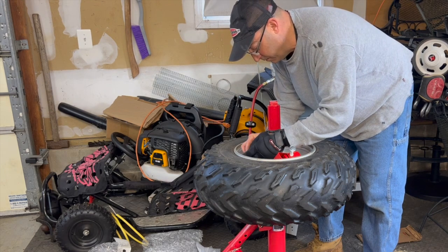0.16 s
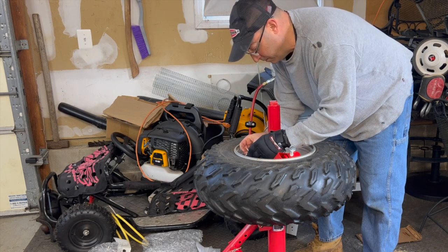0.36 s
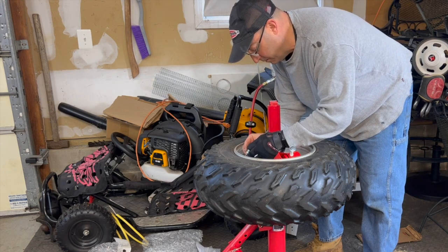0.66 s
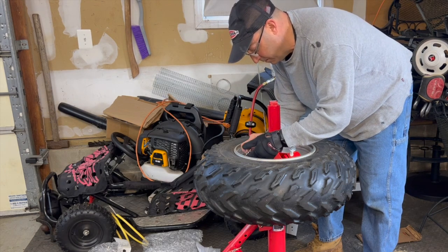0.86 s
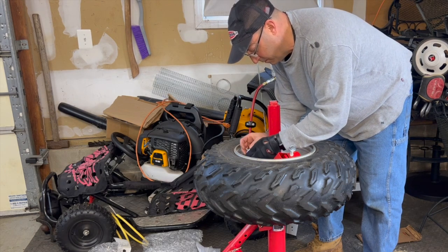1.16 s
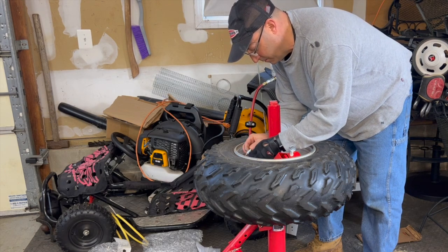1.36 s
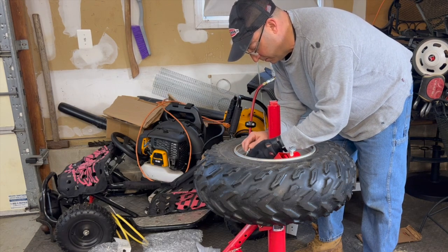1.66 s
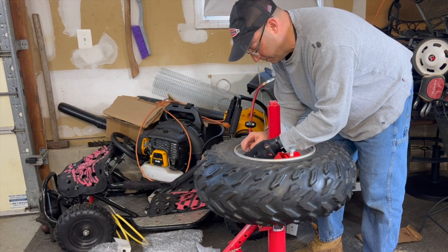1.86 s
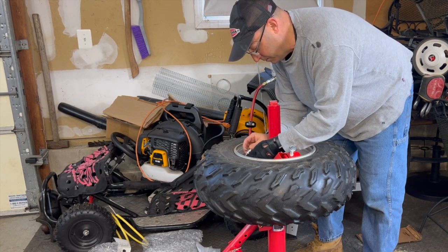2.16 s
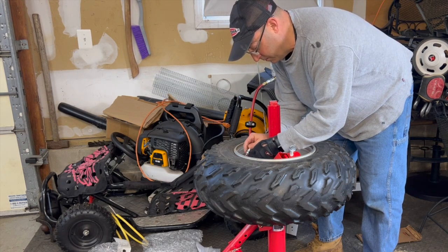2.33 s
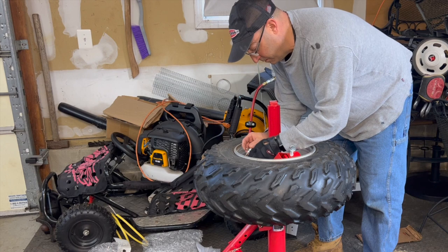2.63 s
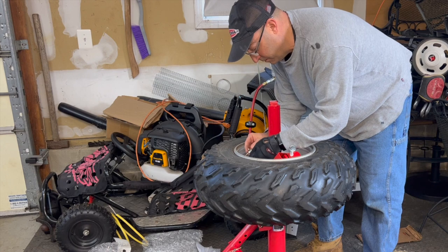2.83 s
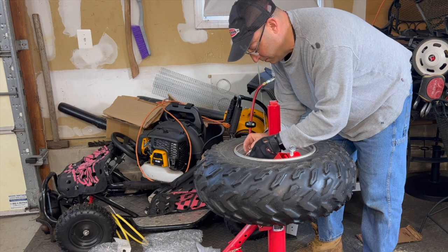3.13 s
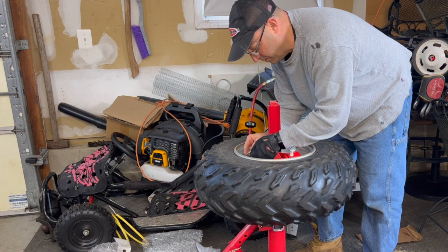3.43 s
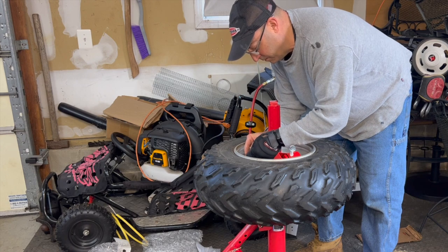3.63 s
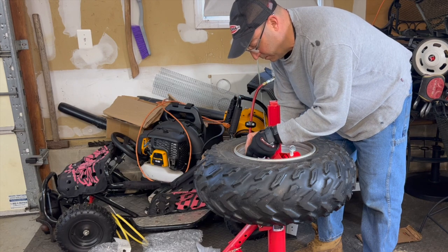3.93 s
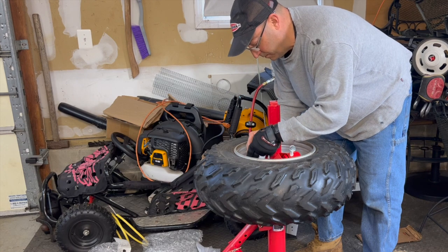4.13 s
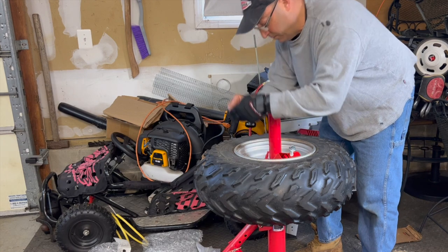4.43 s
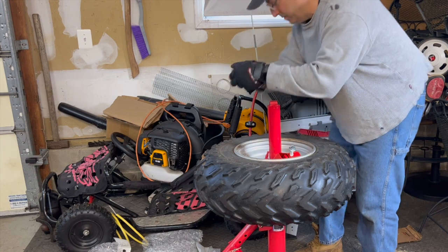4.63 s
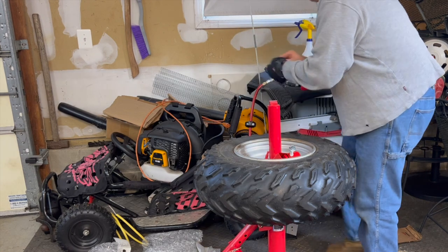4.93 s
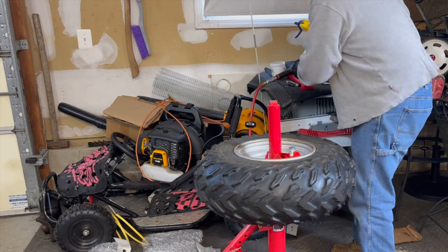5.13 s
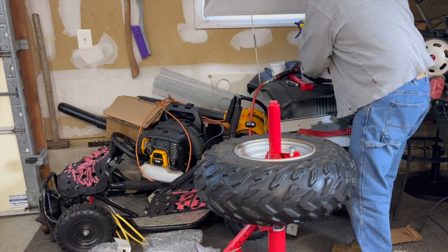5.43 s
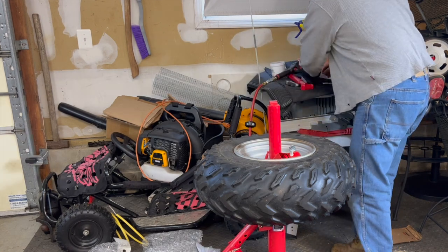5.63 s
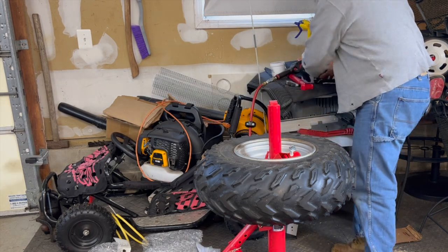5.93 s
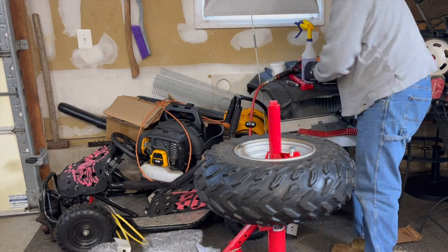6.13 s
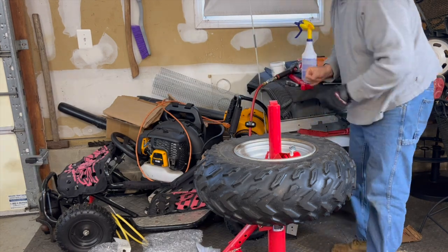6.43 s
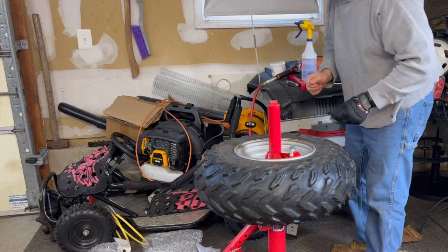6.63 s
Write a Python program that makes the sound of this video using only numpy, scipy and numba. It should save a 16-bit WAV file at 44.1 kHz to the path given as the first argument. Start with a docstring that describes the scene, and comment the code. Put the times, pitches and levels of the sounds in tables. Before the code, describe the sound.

A quiet, hard-walled garage, heard in stereo near a tire. From 0 to 2.5 s there is faint still air, soft low rumble and a very thin, wavering high hiss leaking past a loosened valve core. Soft glove rubs accompany small tool scrapes and rim ticks with slight tire thuds at about 0.9, 1.25 (very faint), 1.45, 1.85, 1.97 (the loudest) and 2.17 s. At 2.55 s air suddenly spurts, dips around 2.7 to 2.8, and spurts again near 3.0, sounding pinched, midrange and hollow under the hand. From 3.1 to 3.8 it hisses unevenly, then jumps up at 3.85 and peaks in a burst near 4.1. A last flutter of hand and tool colour passes around 4.3. From 4.5 to about 6.8 s the hiss is bright, open and steady, with fuller low rumble and short dense echoes, still flowing at the end.

```python
"""In a hard-walled garage a gloved hand unscrews the core of a tire valve.
Narrow-band noise whistles past the seal, glove noise rubs, and scrapes, rim modes and thuds tick.
Then the air spurts and bursts out as coloured noise, with resonances for stem, cupped hand and tool;
it settles to a steady jet once the hand is gone. Dense echoes ring over a low rumble and still air."""
import sys
import numpy as np
from scipy import signal
from scipy.fft import rfft, irfft, next_fast_len
from scipy.io import wavfile
from scipy.ndimage import uniform_filter1d
from numba import njit

SR = 44100
rng = np.random.default_rng(int(sys.argv[2]) if len(sys.argv) > 2 else 0)


def waveform_to_disk(signal):
    """Save audio, clipped to [-1, 1], as 16-bit WAV at the path in sys.argv[1]."""
    frames = np.transpose(np.atleast_2d(signal))
    scaled = np.clip(frames, -1, 1) * 32767
    samples = np.round(scaled).astype(np.int16)
    wavfile.write(sys.argv[1], SR, samples)


def boost_factor(decibels):
    """Convert a level in decibels to a linear amplitude factor."""
    exponent = np.asarray(decibels, float) / 20
    return 10 ** exponent


N = 298998
TIME_S = np.arange(N) / SR


def along(table, hz):
    """Interpolate (Hz, value) points on a log-frequency axis."""
    at_hz, value = np.transpose(table)
    return np.interp(np.log(hz + 1), np.log(at_hz), value)


def colour(x, table):
    """Shape a spectrum by (Hz, dB) points."""
    size = next_fast_len(x.shape[-1])
    gain = boost_factor(along(table, np.fft.rfftfreq(size, 1 / SR)))
    return irfft(rfft(x, size) * gain, size)[..., :x.shape[-1]]


def unit(x):
    """Scale to rms 1."""
    return x / np.sqrt(np.mean(x ** 2))


def curves(table):
    """Interpolate the columns after time_s, sample by sample."""
    time_s, *columns = np.transpose(table)
    return [np.interp(TIME_S, time_s, column) for column in columns]


def walk(rate_hz):
    """Random levels held for 1 / rate_hz, smoothed by two moving averages."""
    hold = int(SR / rate_hz)
    steps = np.repeat(rng.standard_normal(N // hold + 1), hold)
    return uniform_filter1d(uniform_filter1d(steps, hold), hold)[:N]


@njit
def svf(x, centre_hz, width_hz):
    """State-variable band-pass with a moving centre and unity peak gain."""
    y, band, low = np.empty(len(x)), 0., 0.
    for i in range(len(x)):
        g, k = np.tan(np.pi * centre_hz[i] / SR), width_hz / centre_hz[i]
        v = (band + g * (x[i] - low)) / (1 + g * (g + k))
        band, low, y[i] = 2 * v - band, low + 2 * g * v, k * v
    return y


def hollow(modes):
    """Turbulence rings air resonances whose centres wander a little; rms 1."""
    noise = rng.standard_normal(N)
    centres_hz = [hz * (1 + .02 * walk(5)) for hz, _, _ in modes]
    total = np.zeros(N)
    for centre_hz, (_, width_hz, level_db) in zip(centres_hz, modes):
        once = svf(noise, centre_hz, 1. * width_hz)
        total += boost_factor(level_db) * svf(once, centre_hz, 1. * width_hz)
    return unit(total)


def pair(size):
    """Two noises whose left-right correlation depends on frequency."""
    # hz, correlation (0-1)
    alike = [(60, 0.97), (350, 0.77), (900, 0), (3000, 0.14), (5000, 0), (7500, 0), (9500, 0.7)]
    c = np.clip(along(alike, np.fft.rfftfreq(size, 1 / SR)), 0, 1)
    mid, side = rfft(rng.standard_normal((2, size))) * np.sqrt([(1 + c) / 2, (1 - c) / 2])
    return irfft(np.array([mid + side, mid - side]), size)


def jet():
    """Free-jet eddies, the stem's air column, splash in the cupped hand, and shear past the tool."""
    # open valve, two spurts as the core turns, then full flow: time_s, level_db
    flow = [(2.53, -71), (2.58, -38.5), (2.67, -36.5), (2.71, -48.5), (2.8, -47), (2.85, -41), (2.9, -41),
            (2.94, -35.5), (2.99, -35), (3.06, -41.5), (3.15, -39), (3.38, -40.5), (3.46, -38), (3.79, -37),
            (3.87, -31), (3.99, -31.5), (4.08, -27), (4.22, -31), (4.5, -30.5), (6.78, -30.5)]
    # core and tool standing in the stream: time_s, share (0-1)
    tool_in_stream = [(2.55, 0.75), (3.08, 0.98), (3.25, 0.58), (3.46, 0.13), (3.79, 0.54), (3.9, 0),
                      (4.03, .2), (4.1, .65), (4.17, .3), (4.3, 0.51), (4.6, 0.17), (6.78, 0.04)]
    # fingers cupped over the stem, then drawn away: time_s, splash_db (re flow level)
    hand = [(2.55, -4), (3.05, -6), (3.17, -10.5), (3.35, -8), (3.82, -5), (3.98, -11), (4.08, -15),
            (4.33, -6), (4.45, -21), (4.75, -21.5), (6.78, -23)]
    # eddy spectrum: hz, relative density_db (per Hz)
    jet_colour = [(120, -37), (300, -24.5), (550, -26), (1400, -14), (2000, -10.5), (2800, -9),
                  (4600, -8.5), (6700, 0.5), (7800, 0), (9000, 3), (10200, -3), (11000, -1), (12500, -10),
                  (14500, -5), (15300, -8)]
    # air column of the stem: centre_hz, width_hz (each of two passes), relative level_db
    stem_modes = [(2688, 990, 6), (2175, 670, -3.5)]
    # hollow of hand and rim: centre_hz, width_hz (each of two passes), relative level_db
    cup_modes = [(485, 450, -5), (840, 205, -3.5), (933, 1180, 0), (1436, 1130, 1)]
    # air shearing past the tool: centre_hz, width_hz (each of two passes), relative level_db
    edge_modes = [(4160, 2950, 0.5), (5450, 2900, 2)]
    # re flow level
    stem_free_db, stem_blocked_db, edge_free_db, edge_blocked_db = -9, 0, -8, 5.5
    flow_db, splash_db = curves(flow)[0], curves(hand)[0]
    share = np.clip(curves(tool_in_stream)[0], 0, 1)
    stem_db = stem_free_db + share * (stem_blocked_db - stem_free_db)
    edge_db = edge_free_db + share * (edge_blocked_db - edge_free_db)
    eddies = unit(colour(rng.standard_normal(N), jet_colour)) * boost_factor(5.5 + 0.97 * walk(25))
    stem = boost_factor(stem_db + 1.7 * walk(12)) * hollow(stem_modes)
    splash = boost_factor(splash_db + 3.3 * walk(15)) * hollow(cup_modes)
    edge = boost_factor(edge_db + 1.4 * walk(15)) * hollow(edge_modes)
    is_open = TIME_S > flow[0][0]
    return is_open * boost_factor(flow_db) * (eddies + stem + splash + edge)


def leak():
    """A thin leak past the loosened seal: noise in one narrow band with a drifting centre."""
    # loosened core, until the last point: time_s, level_db, centre_hz
    seal = [(0.0, -64, 6200), (.25, -70, 6050), (.48, -65, 6250), (.62, -65, 6150), (.85, -70, 5830),
            (1.15, -70, 6100), (1.38, -65, 6400), (1.55, -65, 6200), (1.72, -72, 6050), (2.0, -66, 6700),
            (2.18, -64, 6700), (2.3, -74, 6050), (2.55, -64, 6500)]
    leak_db, centre_hz = curves(seal)
    hiss = unit(svf(rng.standard_normal(N), centre_hz, 1200.0))
    return hiss * boost_factor(leak_db + 1.5 * walk(15)) * (TIME_S < seal[-1][0])


def glove():
    """Glove rubbing on rubber: coloured friction noise under stroke envelopes."""
    # strokes: peak_s, level_db, fade_s (to -20 dB)
    rubs = [(.47, -76, 0.5), (.62, -75, 0.9), (.92, -70, 0.3), (1.05, -65.5, .18), (1.35, -75, .1),
            (1.47, -62, 0.45), (1.85, -65, 0.1), (1.98, -68, 0.1), (2.175, -63, 0.1), (2.29, -67, 0.1),
            (2.38, -65, 0.7), (2.54, -63, 0.5)]
    # friction spectrum: hz, relative density_db (per Hz)
    rustle = [(120, -30), (300, -12), (700, -4.5), (1500, 0.5), (3000, 3), (5000, -13), (9000, 0),
              (15500, -24)]
    rise_s = .03  # from -20 dB
    strokes = np.zeros(N)
    for peak_s, level_db, fade_s in rubs:
        away = np.maximum((peak_s - TIME_S) / rise_s, (TIME_S - peak_s) / fade_s)
        strokes += boost_factor(level_db - 20 * away)
    return unit(colour(rng.standard_normal(N), rustle)) * strokes * boost_factor(1.3 * walk(44.1))


def ticks():
    """Tool blows: a short scrape, the rim modes nearest its colour, and a thud of the tire."""
    # blows: start_s, level_db, blow_hz, ring_db, thud_db (both re scrape), pan_db (left minus right)
    blows = [(0.922, -50, 900, 0.5, -12, 1.5), (1.255, -59, 538, -10, -12.1, 1.0),
             (1.46, -43.5, 2850, -2, -21.5, 1), (1.845, -51.5, 1780, -7, -9.5, 6.5),
             (1.968, -37, 1500, -3, -16, -0.5), (2.168, -49, 1450, -5, -6.5, -0.5)]
    # rim modes: mode_hz, relative level_db, t60_s
    rim = [(450, -12, .05), (583, -1, .12), (831, 2, 0.12), (1284, -6, 0.12), (1473, 5.5, 0.054),
           (1750, -4, 0.022), (2156, 2.5, 0.072), (2420, -8, 0.11), (2950, -14, 0.053), (4330, -14, .05)]
    out, t = np.zeros((2, N)), TIME_S[:SR // 3]
    mode_hz, mode_db, t60_s = np.transpose(rim)[:, :, None]
    for start_s, level_db, blow_hz, ring_db, thud_db, pan_db in blows:
        share_db = mode_db - 7 * np.log2(mode_hz / blow_hz) ** 2
        ring = (boost_factor(share_db - 60 * t / t60_s) * np.sin(2 * np.pi * mode_hz * t)).sum(0)
        centre_hz = blow_hz + 0 * t
        scrape = svf(rng.standard_normal(len(t)), centre_hz, 1.4 * blow_hz)
        scrape = svf(scrape, centre_hz, 1.5 * blow_hz) * boost_factor(-60 * t / 0.08)
        thud = unit(svf(rng.standard_normal(len(t)), 200 + 0 * t, 310.0)) * boost_factor(-60 * t / 0.16)
        hit = scrape / np.abs(scrape).max()
        hit = hit + boost_factor(ring_db) * ring / np.abs(ring).max() + boost_factor(thud_db) * thud
        hit = hit * np.clip(t * blow_hz / 1.6, 0, 1)  # contact builds up over 1.6 cycles
        i = int(start_s * SR)
        out[:, i:i + len(t)] += hit * boost_factor(level_db + np.array([[pan_db], [-pan_db]]) / 2)
    return out


def echoes():
    """One pattern of dense echoes that lose their treble sooner; energy 1 per channel."""
    wall_s, t60_s, treble_t60_s = .006, 0.61, 0.37
    t = TIME_S[:SR // 2]
    tail = pair(len(t)) * (t > wall_s)
    low = signal.sosfilt(signal.butter(1, 2500, fs=SR, output="sos"), tail)
    tail = low * boost_factor(-60 * t / t60_s) + (tail - low) * boost_factor(-60 * t / treble_t60_s)
    return tail / np.sqrt((tail ** 2).sum(1, keepdims=True))


def garage(x):
    """Direct sound plus echoes; patterns crossfade as the body beside the tire shifts."""
    stances = 8
    place = np.linspace(0, stances - 1, N)
    echo = np.zeros((2, N))
    for k in range(stances):
        fade = np.cos(np.pi / 2 * np.clip(place - k, -1, 1))
        echo += signal.oaconvolve(x * fade, echoes(), axes=1)[:, :N]
    wet = boost_factor(-0.5)  # echoes re direct
    return (x + wet * echo) / np.sqrt(1 + wet ** 2)


def rumble():
    """Low coloured noise, stronger once the air flows, with a brief dip and a random waver."""
    # level curve: time_s, level_db
    rumble_level = [(0.0, -71), (1.7, -71.5), (2.5, -68.5), (2.6, -64), (3.05, -63.5), (3.3, -71),
                    (3.4, -84), (3.5, -68), (3.93, -57.5), (4.1, -63), (4.32, -65), (4.45, -58), (5.0, -57),
                    (6.78, -60)]
    # spectrum: hz, relative density_db (per Hz)
    rumble_colour = [(20, -36), (32, -17), (47, -7.5), (66, 6.5), (85, -3), (120, -0.5), (170, -6),
                     (240, -8.5), (400, -16), (700, -40)]
    waver_db, waver_hz = 2.2, 9
    level_db = curves(rumble_level)[0] + waver_db * walk(waver_hz)
    return unit(colour(pair(next_fast_len(N))[:, :N], rumble_colour)) * boost_factor(level_db)


def still_air():
    """Steady faint coloured noise under everything."""
    # spectrum: hz, relative density_db (per Hz)
    hush = [(120, -20), (250, -12), (500, -4), (1500, -12.5), (4000, -11), (9000, -3.5), (12500, -25),
            (15500, -9.5)]
    return unit(colour(pair(next_fast_len(N))[:, :N], hush)) * boost_factor(-71.5)


def scene():
    """Valve, hand and tool in the garage over rumble and still air."""
    return garage(ticks() + jet() + leak() + glove()) + rumble() + still_air()


def treble_bands(x):
    """Mid or side drops out in set treble bands with ragged edges, wider when the treble is faint."""
    # bands without mid, only the left-right difference sounds: from_hz, to_hz
    no_mid = [(9800, 10500), (13200, 14150)]
    # bands without side, only the common part sounds: from_hz, to_hz
    no_side = [(11600, 12700), (15050, 22050)]
    ragged_hz, faint_hz, faint_db, mid_top_hz = 110, 300, -70, 15720
    hz, _, z = signal.stft(x, SR, nperseg=2048)
    hz = hz[:, None]
    treble = np.sqrt((abs(z[0]) ** 2 * (hz > no_mid[0][0])).sum(0))  # left channel
    widen_hz = faint_hz * (treble < boost_factor(faint_db))
    mid, side = (z[0] + z[1]) / 2 * (hz < mid_top_hz), (z[0] - z[1]) / 2
    keep = []
    for bands in (no_mid, no_side):
        shifts_hz = ragged_hz * rng.standard_normal((len(bands), 2, z.shape[2]))
        dropped = np.zeros(z.shape[1:], bool)
        for (from_hz, to_hz), (a, b) in zip(bands, shifts_hz):
            dropped |= (hz > from_hz + a - widen_hz) & (hz < to_hz + b + widen_hz)
        keep.append(~dropped)
    mid, side = mid * keep[0], side * keep[1]
    return signal.istft(np.array([mid + side, mid - side]), SR, nperseg=2048)[1][:, :N]


def roll_off(x):
    """The treble ends steeply here."""
    return signal.sosfilt(signal.butter(12, 17100, fs=SR, output="sos"), x)


def record(dry):
    """Two microphone ports that differ in colour and in phase."""
    # port colour: hz, level_db (left minus right)
    port_colour = [(300, 1), (2000, 1), (2800, 0), (4600, 3.5), (5600, 6), (6700, 8), (7800, 2.3),
                   (9000, -0.2), (10200, 0.5), (12500, 0.0), (15500, 0)]
    # port phase: hz, lead_rad (right over left)
    turn = [(300, 0), (900, .5), (2000, 0), (2900, -1), (4500, -.7), (5500, -1.3), (7000, -1), (8100, -.3),
            (9100, 1.5), (10150, 3.14), (11900, 6.28), (13700, 9.42), (15300, 12.57)]
    size = next_fast_len(N)
    hz = np.fft.rfftfreq(size, 1 / SR)
    half_db = along(port_colour, hz) / 2
    ports = np.array([boost_factor(half_db), boost_factor(-half_db) * np.exp(1j * along(turn, hz))])
    heard = irfft(rfft(dry, size) * ports, size)[:, :N]
    return roll_off(treble_bands(heard))


dry = scene()
out = record(dry)
waveform_to_disk(out)
```